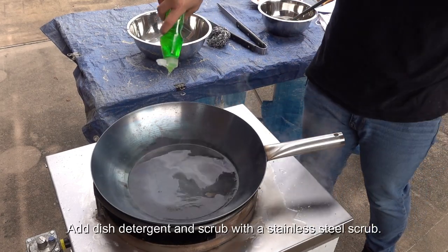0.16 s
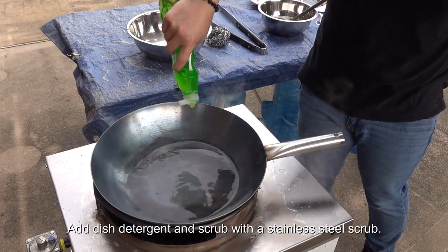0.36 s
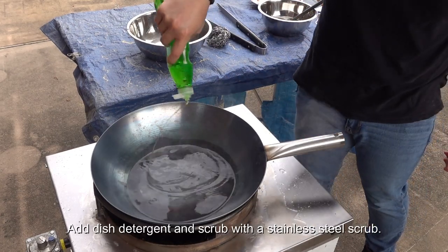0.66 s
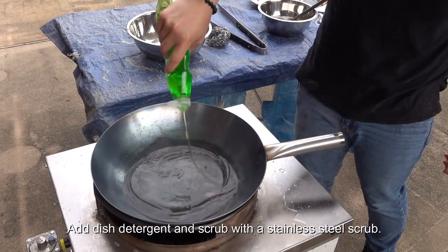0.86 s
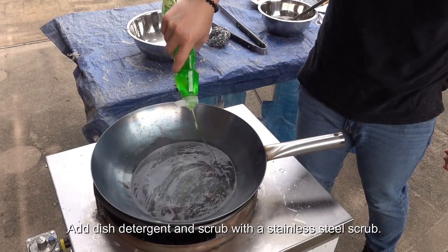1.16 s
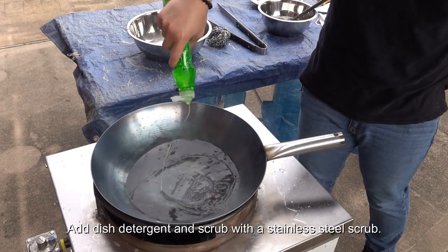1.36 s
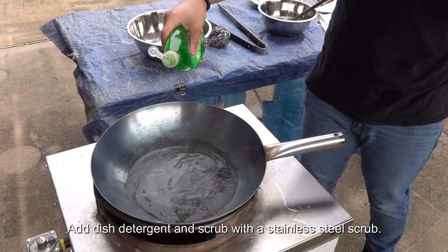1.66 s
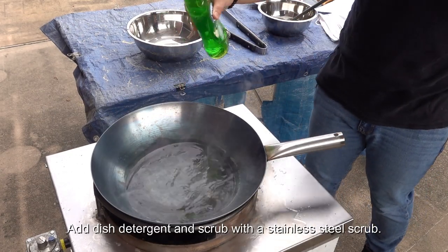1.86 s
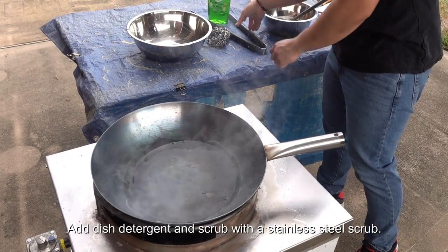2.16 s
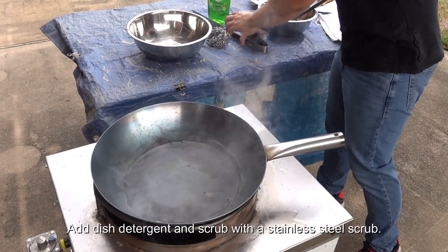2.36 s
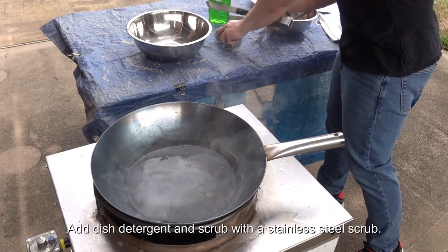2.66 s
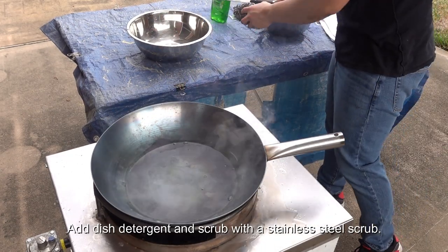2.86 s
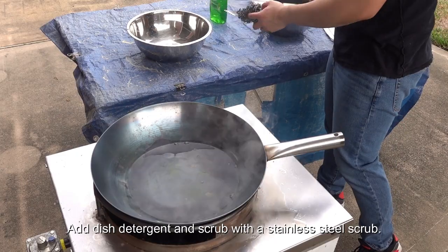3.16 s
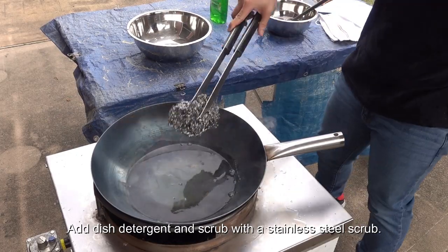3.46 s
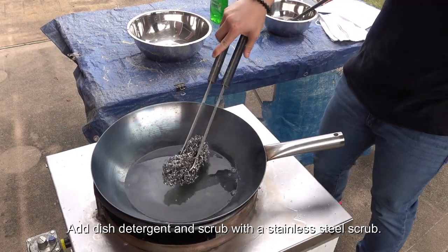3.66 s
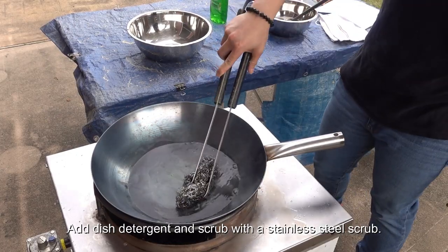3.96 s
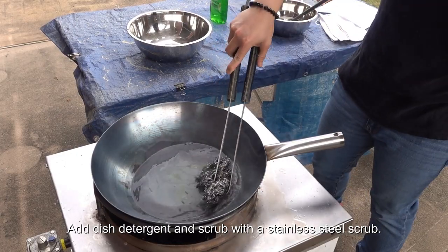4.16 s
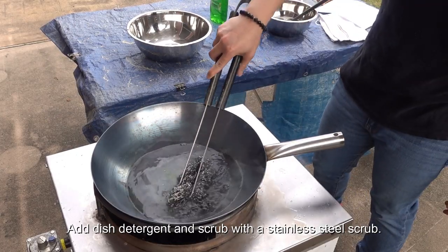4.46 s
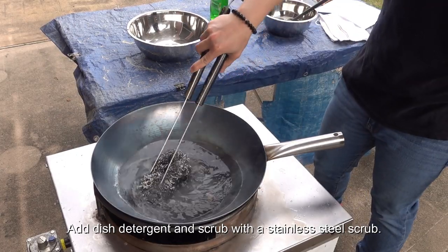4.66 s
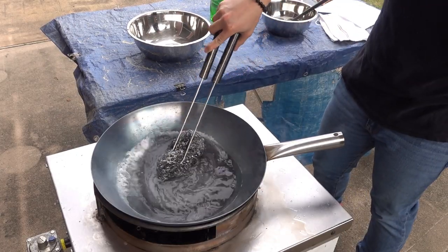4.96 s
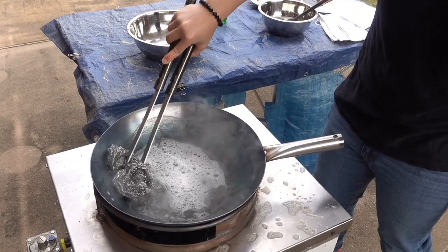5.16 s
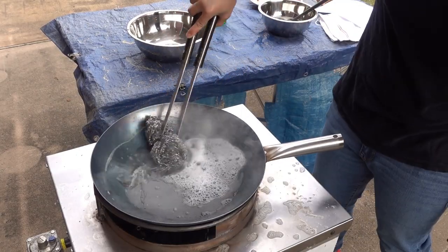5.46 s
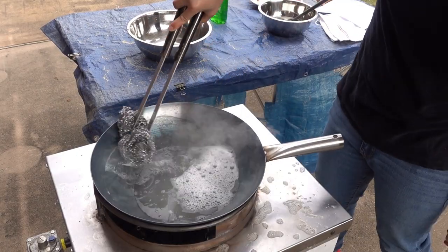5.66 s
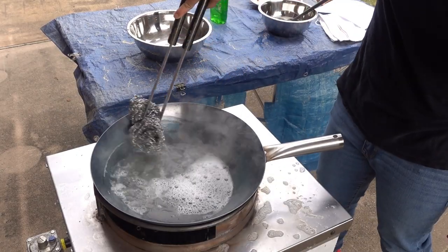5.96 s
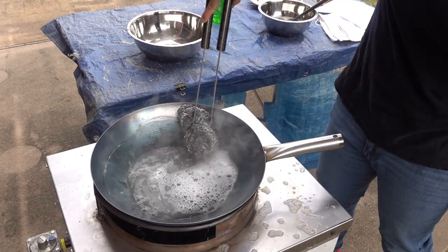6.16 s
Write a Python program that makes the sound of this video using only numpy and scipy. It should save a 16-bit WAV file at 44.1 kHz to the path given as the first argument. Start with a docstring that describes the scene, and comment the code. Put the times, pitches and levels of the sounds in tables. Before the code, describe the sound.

Outdoors, close stereo microphone: a wire scrubber rasps a hot steel wok in uneven strokes, bright hiss mixed with pan ringing and seething soapy water. Tongs clink early, then knock on steel before an abrupt cut to near quiet. A soft contact leads into renewed scraping, strongest near five seconds, cut again and followed by fading shorter strokes. A gas burner roars softly throughout.

```python
"""A steel-wool pad held in tongs scrubs a hot steel wok: thousands of wire slips a second hiss and sizzle in
three ranges and drive the pan's resonances; a low floor of the same noise is the soapy water seething.
Two hard cuts jump to another moment of the scrubbing. The gas burner is filtered noise with a faint whistle.
The tongs clink and clank as struck modes with a few outdoor echoes; wire ticks and stand bumps ring singly."""
import sys
import numpy as np
from scipy import signal
from scipy.fft import rfft, irfft
from scipy.io import wavfile
from scipy.ndimage import uniform_filter1d, map_coordinates

SR = 44100
rng = np.random.default_rng(int(sys.argv[2]) if len(sys.argv) > 2 else 0)


def how_loud(loudness_db):
    """Turn decibels into a plain amplitude multiplier (0 dB gives 1, 20 dB gives 10)."""
    steps = np.asarray(loudness_db, float) / 20
    return 10 ** steps


def log_audio(samples):
    """Write samples as a 16-bit WAV file to the path given in sys.argv[1]."""
    # one column per channel
    frames = np.atleast_2d(samples).T
    # limit to full scale, then quantise
    limited = np.clip(frames, -1, 1)
    pcm = np.round(limited * 32767).astype(np.int16)
    wavfile.write(sys.argv[1], SR, pcm)


N = 277830

# Colour of the scrubbing noise before its ranges are balanced: freq_hz, density_db (per Hz, relative)
SCRAPE_COLOUR = [(18, -70), (30, -38), (316, -31), (370, -11.5), (750, -10), (832, -9), (1300, -5),
                 (1480, -5.5), (1730, -2.5), (2030, -2.5), (4220, -0.5), (5060, -4), (15600, -9)]
# Wok resonances: mode_hz, width_hz, drive_db (relative)
WOK_MODES = [(847, 21, -1), (1138, 21.4, 0.5), (1414, 34, 0.5), (1520, 27, 1.5), (1885, 10, -1.5),
             (1994, 23, -7.5), (2216, 13.4, 4), (2385, 25, -12.5), (2535, 40, -5), (2756, 30, -6),
             (3060, 14, -9), (3403, 36, -9.5), (3607, 31, -6.5), (3850, 17, -15.5), (4093, 40, -5),
             (4303, 13, -5), (4550, 19, -4.5), (4700, 44, -6)]
# Colour of the burner roar and far outdoor hiss: freq_hz, density_db (per Hz, relative)
ROAR_COLOUR = [(15, -75), (25, -52), (113, -22.5), (210, -17.5), (227, -11), (341, -6.5), (633, -6.5),
               (686, 3.5), (744, -9.5), (1030, -6.5), (1670, -7), (2640, -6), (15600, -12)]
# Left-right likeness of the noise: freq_hz, likeness (1 = the same on both sides)
LIKENESS = [(60, 0.64), (150, 0.96), (380, 1), (950, 0.85), (2380, 0.76), (5980, 0.33), (15000, 0.76)]
# Left-right tilt of the noise: freq_hz, left_over_right_db
BALANCE = [(60, -2), (180, 1), (550, 0.5), (1650, 1.0), (4970, 0.5), (15000, -1.5)]
# Where the pad works: time_s (glides from point to point), brightening towards the rim
# (db_per_octave on the pan modes), right_late_us, ring_db (how hard the pan is rung there)
SWING = [(0, 0.5, 3, -2.5), (.55, 0.5, 10, 5), (1.05, -.3, 10, -4), (1.5, -1, 10, 3), (2.1, 2, -7, 3),
         (2.45, -2, -3, 4), (2.62, 2, -3, 2.2), (2.8, -4.5, 5, -2.5), (3.8, -0.5, -10, 1.5),
         (4.1, 1, -3, -1.5), (4.3, 2, 2, 8), (4.6, 5, 19, 5), (4.85, 3, 18, 6), (4.96, -3.5, 10, 4.5),
         (5.18, 3, 9, -4), (5.35, 8.5, 9, 2.2), (5.7, 4.5, 5, 1.5), (6.3, 0.5, 0, 3)]
# Strokes of the pad: peak_s, scrape_db (relative), swell_s and fade_s (each for 20 dB), sizzle_over_scrape_db
STROKES = [(0.045, -31.5, 0.115, 0.073, 4.5), (0.173, -50.7, 0.075, 0.048, 8.1),
           (0.29, -40.0, 0.051, 0.052, -15.6), (0.547, -25.5, 0.068, 0.079, 0.5),
           (0.94, -42.4, 0.052, 0.074, 4.1), (1.051, -35.6, 0.075, 0.045, 2.1),
           (1.181, -45.1, 0.292, 0.127, 0.0), (1.553, -30.6, 0.154, 0.163, 2.5),
           (1.734, -36.8, 0.281, 0.312, 0.4), (2.035, -31.9, 0.241, 0.503, 1.7),
           (2.375, -39.3, 0.175, 0.266, -1.7), (2.604, -33.1, 0.075, 0.126, 2.4),
           (3.458, -50.7, 0.046, 0.03, 5.9), (3.719, -41.0, 0.075, 0.068, -11.5),
           (4.095, -31.8, 0.069, 0.141, 4.8), (4.268, -30.3, 0.069, 0.105, 5.5),
           (4.537, -39.7, 0.09, 0.08, 3.9), (4.634, -32.5, 0.029, 0.123, 0.3),
           (4.727, -27.2, 0.118, 0.12, 2.2), (4.83, -28.1, 0.117, 0.02, 6.2),
           (4.86, -21.9, 0.069, 0.174, -1.2), (4.977, -23.3, 0.201, 0.085, 2.0),
           (5.041, -34.8, 0.027, 0.15, 3.2), (5.216, -24.5, 0.08, 0.1, 4.1),
           (5.235, -38.9, 0.02, 0.067, 0.4), (5.288, -35.5, 0.058, 0.05, 0.2),
           (5.311, -30.9, 0.02, 0.071, -3.5), (5.373, -30.0, 0.062, 0.082, 2.1),
           (5.6, -39.7, 0.107, 0.037, 1.9), (5.633, -37.5, 0.02, 0.228, -0.6),
           (5.777, -44.5, 0.021, 0.02, 0.4), (5.865, -37.6, 0.094, 0.179, -1.9),
           (6.041, -39.3, 0.078, 0.18, 2.2), (6.153, -43.0, 0.09, 0.065, -10.9),
           (6.261, -40.1, 0.08, 0.21, -0.3)]
# Seething under the strokes: time_s (glides from point to point), level_db (relative), sizzle_over_level_db
SEETHE = [(0, -43.6, -1.6), (1.3, -43.8, -.4), (2.7, -43, 1.7), (3.316, -42.3, .9), (3.322, -57, .3),
          (3.42, -58, -6), (3.5, -51.4, -4.6), (4.0, -49, -3.8), (4.4, -43.8, 2.7), (5.186, -37, -1.3),
          (5.19, -56, -.6), (5.3, -49, -1.5), (5.5, -48.4, -2.3), (5.75, -48.7, 3.5), (6.3, -48.3, -9)]
# Hard edits: the sound of the scrubbing jumps to another moment, ending strokes and ringing: time_s
CUTS_S = [3.32, 5.188]
# Wire ticks on the rim (high), soft bumps of the stand (low): start_s, level_db, pitch_hz, t60_s
TICKS = [(.176, -30, 11000, .006), (3.328, -27, 12900, .004), (3.407, -36, 10500, .01),
         (3.704, -29, 9600, 0.016), (3.707, -32, 10300, 0.013), (3.709, -33, 13500, .01),
         (3.895, -30, 14000, .004), (3.695, -41, 500, .07), (3.715, -43, 800, .05), (3.9, -64, 119, .3),
         (6.08, -51, 228, 0.38)]
# Tongs arms rattling together: start_s, level_db (relative), rattle_s, contact_pitch_hz,
# free (share of the ring time left by the grip)
CLINKS = [(.273, -25.5, 0.015, 3900, 0.33), (.288, -29.5, 0.017, 4800, .5), (1.03, -33, 0.032, 5200, .9),
          (1.046, -29, 0.014, 4380, .9), (1.061, -31, 0.014, 4300, .9), (1.08, -37, .02, 4300, .9),
          (4.503, -37, .02, 4200, .4)]
# Modes of the tongs arms: mode_hz, level_db (relative), t60_s (ungripped)
ARM_MODES = [(3450, 2, .04), (4050, 2, 0.037), (4297, -1, 0.15), (4600, 0, .04), (4780, 5, .04),
             (4825, -12, .08), (5070, 3, .04), (5670, 1, .04)]
# Tongs knocked on steel: start_s, level_db (relative), chatter_s, contact_pitch_hz,
# free (share of the ring time left by the grip)
CLANKS = [(2.814, -24, 0.0078, 3330, 1), (2.819, -23, 0.018, 3300, 0.64), (2.85, -33.5, 0.012, 1500, 0.89),
          (3.703, -35, 0.012, 2500, 0.4), (3.717, -37, 0.01, 1200, 0.5)]
# Modes of the knocked steel: mode_hz, level_db (relative), t60_s (ungripped)
STEEL_MODES = [(596, -10, 0.054), (1033, -9, 0.12), (1090, -12, 0.071), (1274, -8, 0.21), (1460, 1, 0.034),
               (1653, -6, .3), (1760, -1, .05), (1870, -10, .15), (2019, -9, .07), (2150, -13, 0.4),
               (2900, -22, 0.064), (3270, -14, 0.17), (6620, -10, .03), (6993, 0, 0.05), (7220, -2, .025),
               (7450, 1, .025), (7806, 0, .025), (8100, 1, 0.03), (8350, -9, .02)]
# Echoes from ground and table: left_delay_s, right_delay_s, level_db (on top of the dulling)
ECHOES = [(.007, 0.012, -3), (0.021, 0.0057, -27), (0.035, .041, -28)]

RUSH_TO_HZ, SIZZLE_FROM_HZ = 1300, 5500  # edges between low rush, scrape and sizzle


def rms_one(x):
    """Scale to unit rms."""
    return x / np.sqrt(np.mean(x ** 2) + 1e-20)


def at_hz(points, hz):
    """Read a table on a log-frequency axis."""
    points = np.array(points)
    return np.interp(np.log(hz), np.log(points[:, 0]), points[:, 1])


def drift(rate_hz):
    """Slow chance: noise twice through a one-pole low-pass, spread 1."""
    hop = 40  # samples between slow values
    r = np.exp(-2 * np.pi * rate_hz * hop / SR)
    noise = rng.standard_normal(N // hop + 2002)
    slow = signal.lfilter([1], [1, -2 * r, r * r], noise)[2000:]
    return np.interp(np.arange(N) / hop, np.arange(len(slow)), rms_one(slow))


def resonance(x, hz, width_hz):
    """Two-pole resonance, gain 1 on top."""
    r = np.exp(-np.pi * width_hz / SR)
    zeros = np.array([1, 0, -1]) * (1 - r * r) / 2
    return signal.lfilter(zeros, [1, -2 * r * np.cos(2 * np.pi * hz / SR), r * r], x)


def lagged(x, lag_us):
    """Two microphone ports: the right one hears the source this many microseconds after the left."""
    half = lag_us * SR / 2e6  # half the lag in samples, left early and right late
    return np.array([map_coordinates(side, [np.arange(N) + way * half], order=5, mode="nearest")
                     for side, way in zip(x, (1, -1))])


def bands(mid, side, colour, patchy_db):
    """Overlapping half-octave bands in stereo, coloured, each flickering on its own: yields (Hz, sound)."""
    hz = np.maximum(np.arange(N // 2 + 1) * SR / N, 1)
    alike = np.clip(at_hz(LIKENESS, hz), 0, 1)
    both = np.sqrt(1 + alike) * rfft(mid) + np.sqrt(1 - alike) * rfft(side) * [[1], [-1]]
    both = both * how_loud(at_hz(colour, hz) + at_hz(BALANCE, hz) * [[.5], [-.5]])
    for centre in RUSH_TO_HZ * 2 ** np.arange(-5.75, 4, .5):
        share = np.clip(1 - 2 * np.abs(np.log2(hz / centre)), 0, 1)
        yield centre, irfft(both * share, N) * how_loud(patchy_db * drift(8.6))


def slips(per_s, spread_db):
    """Dense random wire slips of uneven size over smooth friction noise."""
    sizes = how_loud(spread_db * np.minimum(rng.exponential(1, N), 5)) * rng.choice([-1, 1], N)
    clicks = sizes * (rng.random(N) < per_s / SR)
    return rms_one(clicks) + 0.54 * rng.standard_normal(N)


def pressure():
    """Seething and all strokes add up in power: (scrape dB, sizzle dB over it)."""
    roundness = 2.07  # a stroke's level falls off as this power of the time from its peak
    smooth_s = .002   # makes each hard cut a very short crossfade of level
    t = np.arange(N) / SR
    s, db, sizzle_db = np.transpose(SEETHE)
    scrape = how_loud(2 * np.interp(t, s, db))
    sizzle = how_loud(2 * np.interp(t, s, db + sizzle_db))
    edges = np.array([-1, *CUTS_S, 9])
    for s, db, swell, fade, sizzle_db in STROKES:
        # each stroke is heard only between the cuts on either side of it
        passage = np.searchsorted(edges, s - swell / 2)
        first = max(s - 2 * swell, edges[passage - 1])
        last = min(s + 2 * fade, edges[passage])
        near = slice(*np.searchsorted(t, [first, last]))
        apart = np.where(t[near] < s, (s - t[near]) / swell, (t[near] - s) / fade)
        power = how_loud(2 * (db - 20 * apart ** roundness))
        scrape[near] += power
        sizzle[near] += power * how_loud(2 * sizzle_db)
    scrape, sizzle = uniform_filter1d([scrape, sizzle], size=int(smooth_s * SR))
    return 10 * np.log10(scrape), 10 * np.log10(sizzle / scrape)


def per_passage(x, hz, width_hz):
    """Resonance that starts afresh at each hard cut, so no ringing carries over."""
    parts = np.split(x, (np.array(CUTS_S) * SR).astype(int), axis=-1)
    return np.concatenate([resonance(part, hz, width_hz) for part in parts], axis=-1)


def wok_ringing(drive, rim_db):
    """Pan modes rung by the slips; the contact point wanders, so each is driven unevenly in time."""
    wander_db = 2.8
    pan = 0
    for hz, width_hz, db in WOK_MODES:
        mode_db = db + rim_db * np.log2(hz / 2500) + wander_db * drift(4.1)
        pan = pan + per_passage(drive * how_loud(mode_db), hz, width_hz)
    return pan


def scrubbing():
    """The slips radiate directly in three ranges and also drive the pan's resonances."""
    scrape_db, sizzle_db = pressure()
    # wet low rush over the scrape: it does not follow 0.35 of a rise above the -35 dB reference
    rush_db = -10.2 - .35 * (scrape_db + 35)
    mid, side = slips(per_s=12000, spread_db=3.0), slips(per_s=12000, spread_db=2.5)
    s, *columns = np.transpose(SWING)
    rim_db, lag_us, ring_db = [np.interp(np.arange(N) / SR, s, column) for column in columns]
    swing_db = .3 + .03 * lag_us  # left over right: the nearer side is also the louder
    rush = scrape = sizzle = 0
    for hz, band in bands(mid, side, SCRAPE_COLOUR, patchy_db=1.34):
        if hz < RUSH_TO_HZ:
            rush = rush + band
        elif hz < SIZZLE_FROM_HZ:
            scrape = scrape + band * how_loud(0.53 * rim_db * np.log2(hz / 2700))
        else:
            sizzle = sizzle + band
    direct = rms_one(scrape) + how_loud(sizzle_db) * rms_one(sizzle) + how_loud(rush_db) * rms_one(rush)
    drive = (mid + 0.12 * side * [[1], [-1]]) * how_loud(scrape_db + ring_db)
    pan = wok_ringing(drive, rim_db)
    mix = how_loud(scrape_db + 0.5) * direct + how_loud(2.5) * pan
    return how_loud(swing_db * [[.5], [-.5]]) * lagged(mix, lag_us)


def burner():
    """Smooth roar of coloured noise, with a faint wavering whistle of noise through a narrow resonance."""
    roar_db, whistle_db = -43, -60.5
    noise = rng.standard_normal((2, N))
    roar = sum(band for hz, band in bands(*noise, ROAR_COLOUR, patchy_db=-0.15))
    whistle = resonance(rng.standard_normal(N), hz=700, width_hz=4)
    # the burner reaches the right microphone first
    return how_loud(roar_db) * lagged(rms_one(roar), lag_us=-23) + how_loud(whistle_db) * rms_one(whistle)


def ring(force, hz, t60):
    """Decaying mode: a unit click sets a sine of height 1 ringing."""
    r, w = how_loud(-60 / (t60 * SR)), 2 * np.pi * hz / SR
    return signal.lfilter([0, np.sin(w)], [1, -2 * r * np.cos(w), r * r], force + 1e-18)


def ticks():
    """Ticks and bumps: each swells over five cycles of the pitch it rings at, then dies."""
    out = np.zeros(N)
    for s, level_db, hz, t60 in TICKS:
        force, touch = np.zeros(N), np.hanning(int(5 * SR / hz))
        cycles = np.cos(2 * np.pi * hz * np.arange(len(touch)) / SR)
        start = int(s * SR)
        force[start:start + len(touch)] = 2 * touch * cycles / touch.sum()
        out += how_loud(level_db) * ring(force, hz, t60)
    return out


def struck(events, modes, touches_per_s, focus_db):
    """A first touch and a fading run of bounces; modes lose focus_db per octave from the contact's pitch."""
    out = np.zeros(N)
    t = np.arange(SR // 2) / SR
    for s, event_db, length, centre_hz, free in events:
        touches = (rng.random(len(t)) < touches_per_s / SR) * (t < length)
        bounce = touches * how_loud(-5 * np.minimum(t / length, 1))
        start = int(s * SR)
        for hz, db, t60 in modes:
            force = bounce * rng.normal(0, 0.37, len(t))
            force[0] = 0.48  # the first touch
            level = how_loud(event_db + db - focus_db * abs(np.log2(hz / centre_hz)))
            out[start:start + len(t)] += level * ring(force, hz, free * t60)  # a firm grip shortens the ring
    return signal.sosfilt(signal.butter(2, 450, "high", fs=SR, output="sos"), out)


def yard(x):
    """A few dull echoes, arriving differently on each side."""
    dull = signal.lfilter([.4], [1, -.6], x)
    out = np.zeros((2, N))
    for left_s, right_s, db in ECHOES:
        out[0] += how_loud(db) * np.roll(dull, int(left_s * SR))
        out[1] += how_loud(db) * np.roll(dull, int(right_s * SR))
    return out


def scene():
    """Scrubbing, burner, ticks and bumps, and the tongs (1 dB louder on the left) with their echoes."""
    clinks = struck(CLINKS, ARM_MODES, touches_per_s=920, focus_db=35.0)
    clanks = struck(CLANKS, STEEL_MODES, touches_per_s=700, focus_db=2.5)
    tongs = clinks + clanks
    return scrubbing() + burner() + ticks() + tongs * how_loud([[.5], [-.5]]) + yard(tongs)


def roll_off(x):
    """The treble ends steeply here."""
    return signal.sosfilt(signal.butter(12, 17020, fs=SR, output="sos"), x)


def record(dry):
    """A steep low-pass cuts the top above 15850 Hz."""
    low_pass = signal.ellip(12, .5, 60, 15850, fs=SR, output="sos")
    mix = signal.sosfilt(low_pass, dry)
    return roll_off(mix)


dry = scene()
out = record(dry)
log_audio(out)
```